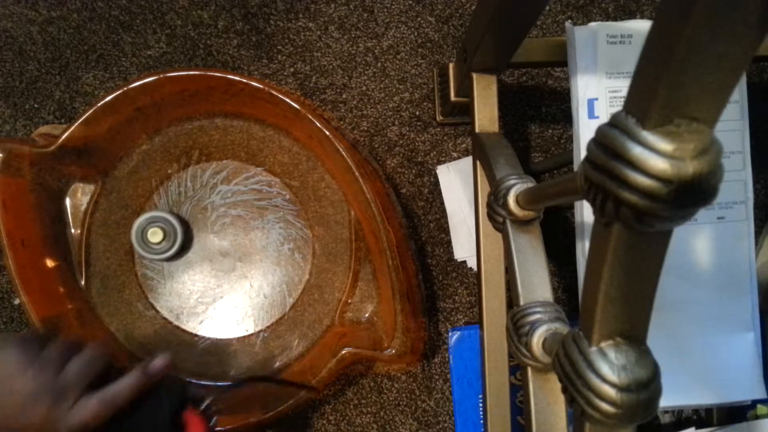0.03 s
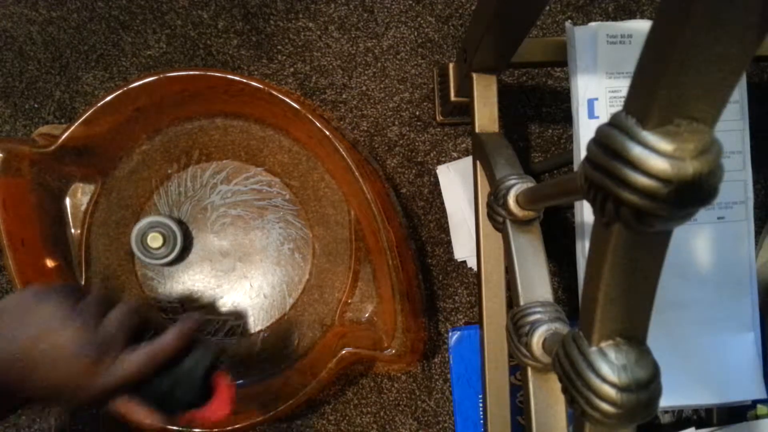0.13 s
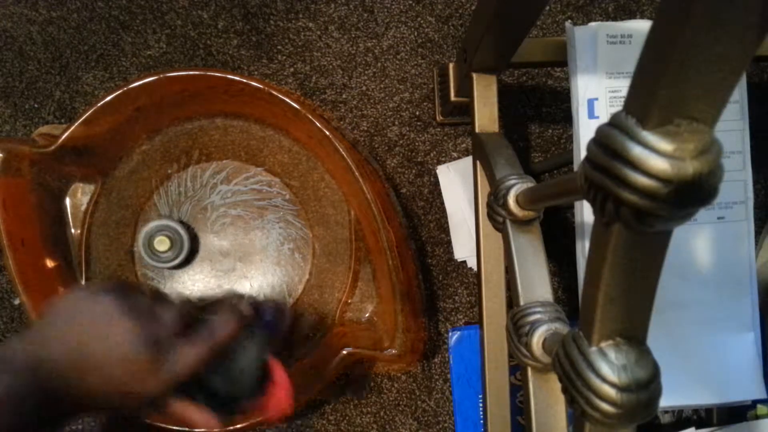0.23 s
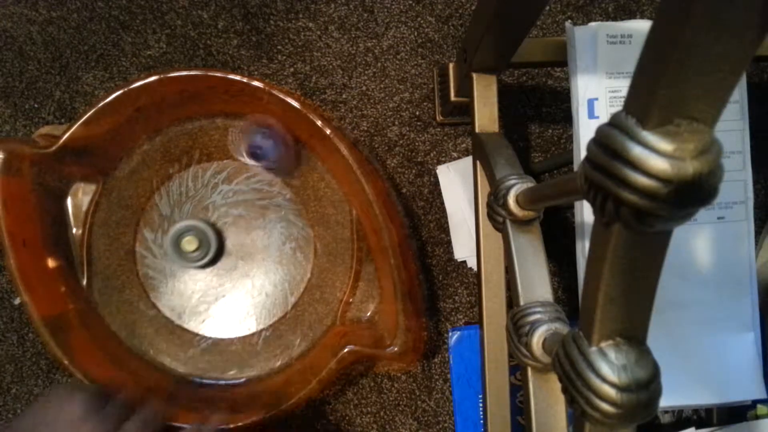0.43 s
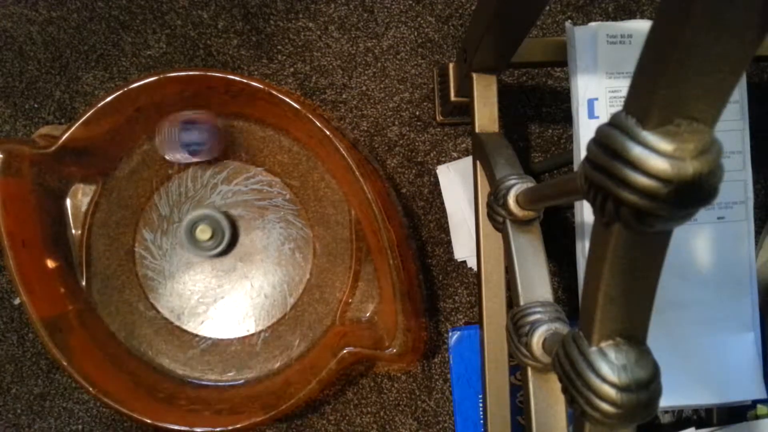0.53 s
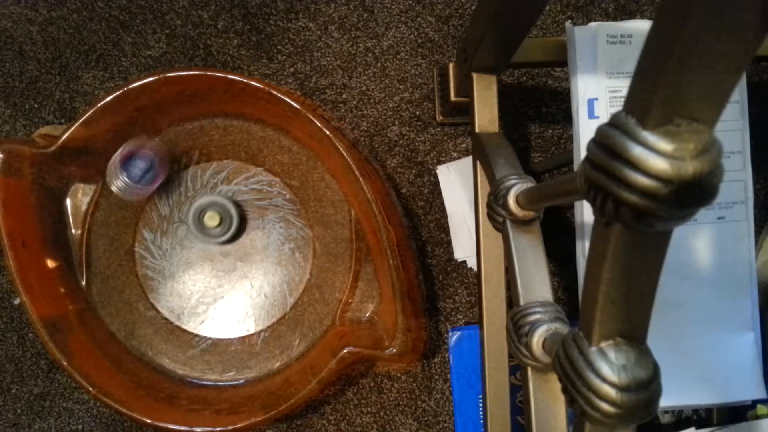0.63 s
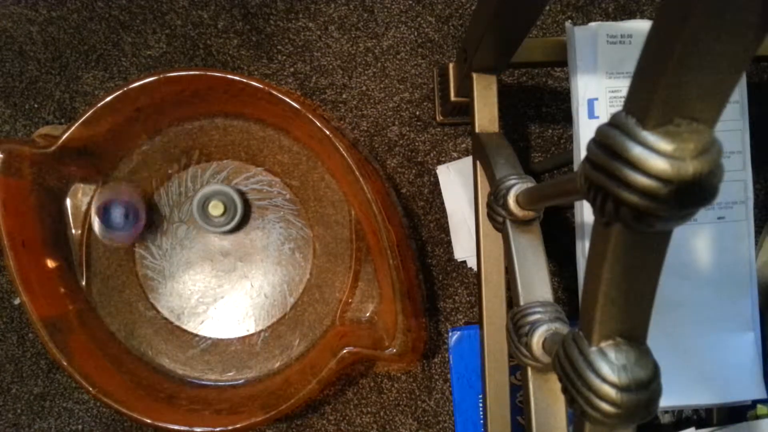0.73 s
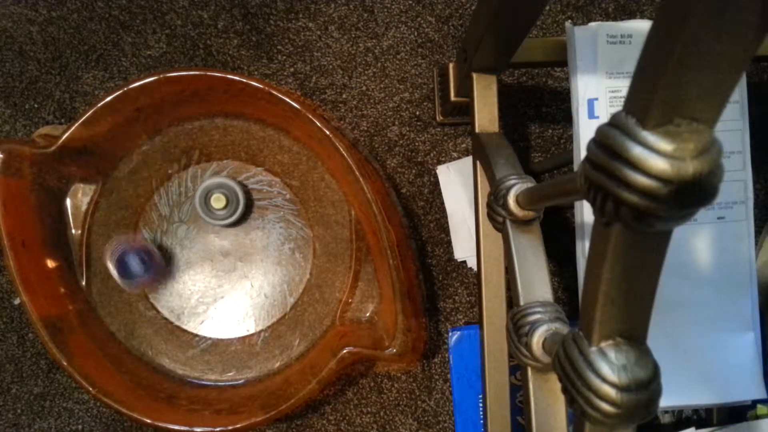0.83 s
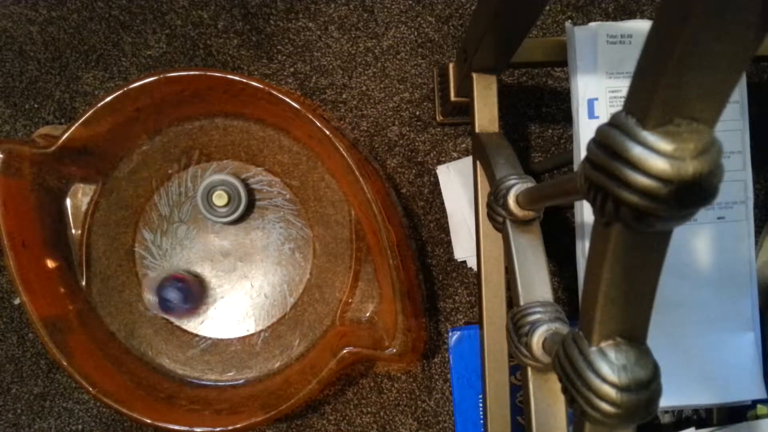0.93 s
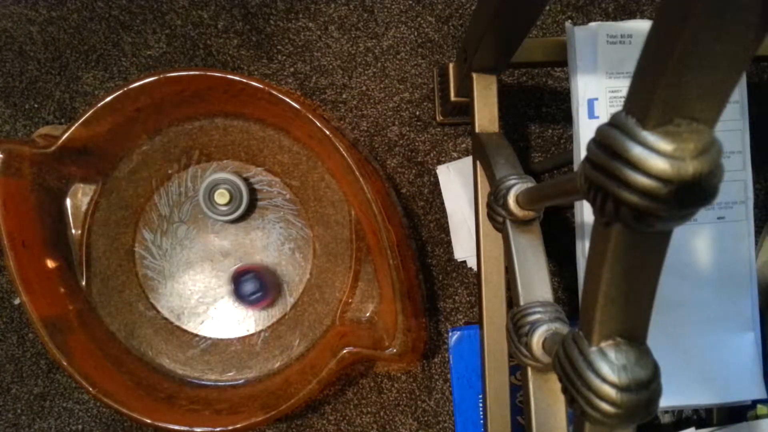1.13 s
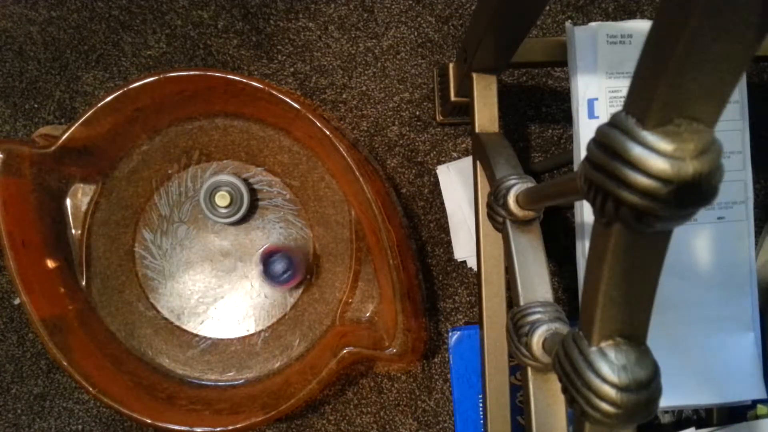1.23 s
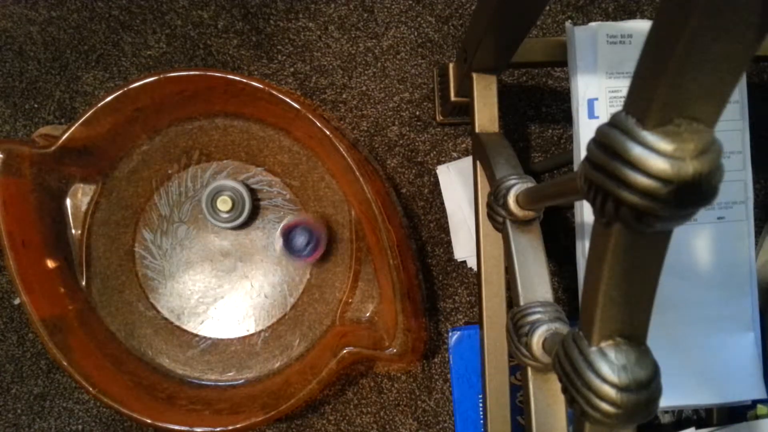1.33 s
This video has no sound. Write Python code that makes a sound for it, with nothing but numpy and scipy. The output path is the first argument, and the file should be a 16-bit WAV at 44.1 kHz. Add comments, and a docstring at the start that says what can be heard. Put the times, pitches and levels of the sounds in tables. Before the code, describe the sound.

Close to the microphone in a small room, a spinning top clatters in a plastic bowl: first a short zip and click from its launcher, then a hollow landing, loud rattling knocks, and finally two tops softly humming.

```python
"""Spinning top launched into an arena

A ripcord is pulled through a toy launcher: its teeth rasp ever faster, then a catch lets the top go.
The top thuds into a thin plastic arena, bounces, rattles along the wall and settles to a hum
beside a second top. A small room echoes, and the close microphone clips on the loudest peaks."""
import sys
import numpy as np
from scipy import signal
from scipy.fft import rfft, irfft, next_fast_len
from scipy.io import wavfile
from scipy.ndimage import map_coordinates

SR = 44100
rng = np.random.default_rng(int(sys.argv[2]) if len(sys.argv) > 2 else 0)


def waveform_to_disk(signal):
    """Save audio, clipped to [-1, 1], as 16-bit WAV at the path in sys.argv[1]."""
    frames = np.transpose(np.atleast_2d(signal))
    scaled = np.clip(frames, -1, 1) * 32767
    samples = np.round(scaled).astype(np.int16)
    wavfile.write(sys.argv[1], SR, samples)


N = 61739


def amp(db):
    """Turn decibels into a gain."""
    return 10 ** (np.asarray(db) / 20)


def along(points, hz):
    """Read a table of (pitch_hz, value) rows at any pitch."""
    pitches, values = np.transpose(points)
    return np.interp(np.log(hz + 1), np.log(pitches + 1), values)


def curves(rows):
    """Join timed rows with straight lines: one curve for each column after the time."""
    times, *columns = np.transpose(rows)
    return [np.interp(np.arange(N) / SR, times, column) for column in columns]


def wobble(rate):
    """A smooth random curve that passes through rate new values a second."""
    return map_coordinates(rng.standard_normal(N // 100), [np.arange(N) * rate / SR], mode="wrap")


def filtered(x, response):
    """Multiply each frequency in x by response(hz)."""
    size = next_fast_len(N + SR // 2)
    return irfft(rfft(x, size) * response(np.fft.rfftfreq(size, 1 / SR)), size)[..., :N]


def noise(tone, alike):
    """Stereo noise of strength 1, shaped by a tone table; alike is the share both sides have in common."""
    left, right, both = filtered(rng.standard_normal((3, N)), lambda hz: amp(along(tone, hz)))
    mix = np.sqrt(alike) * both + np.sqrt(1 - alike) * np.array([left, right])
    return mix / np.sqrt(np.mean(mix ** 2) + 1e-20)


def pan(left_db):
    """Two gains that make the left side left_db louder; below zero, the right is louder."""
    return amp(np.array([[.5], [-.5]]) * left_db)


def fade(fade_s):
    """Half a second of a curve that starts at 1 and drops 60 dB every fade_s."""
    return np.exp(-np.log(1000) * np.arange(SR // 2) / SR / fade_s)


def ring(hz, fade_s):
    """One tone that dies away."""
    return fade(fade_s) * np.sin(2 * np.pi * hz * np.arange(SR // 2) / SR)


def strikes(times, gains, shape):
    """Start a copy of the shape at each time, with its own gain."""
    pulses = np.bincount(np.abs(np.asarray(times) * SR).astype(int), gains, N)[:N]
    return signal.fftconvolve(pulses, shape)[:N]


def bursts(times, db, shape):
    """The loudness curve of overlapping blows whose power adds up."""
    return np.sqrt(np.abs(strikes(times, amp(db) ** 2, shape ** 2)))


# How long the room rings: pitch_hz, fade_s
ROOM_FADES = [(100, 0.37), (400, 0.29), (1500, 0.42), (4500, 0.34), (9000, 0.46), (15000, .25)]
# The tone of its echo: pitch_hz, level_db
ROOM_TONE = [(60, -13.5), (250, -18), (700, -7), (2000, -4), (5000, -4), (14000, -7.5)]
ECHO_DELAY_S = 0.0048


def room(x):
    """The walls return a blurred echo in which each pitch dies at its own speed."""
    hz, t, spectrum = signal.stft(rng.standard_normal((2, SR // 2)), SR, nperseg=256)
    decay = np.exp(-np.log(1000) * t / along(ROOM_FADES, hz)[:, None])
    tail = signal.istft(spectrum * decay, SR, nperseg=256)[1]
    tail = np.pad(tail / np.linalg.norm(tail[0]), ((0, 0), (int(ECHO_DELAY_S * SR), 0)))
    echo = signal.fftconvolve(x.sum(0)[None] / np.sqrt(2), tail, axes=1)[:, :N]
    return filtered(echo, lambda f: amp(along(ROOM_TONE, f))) * pan(left_db=3)


# Tones of the tips spinning on the arena floor: pitch_hz, level_db, left_db
HUM_TONES = [(215.6, -60.5, -4), (349, -68.5, -5), (406.4, -52, 5.5), (484, -64, -11), (564, -60.5, -2.5),
             (586, -54.5, -8), (810, -74.5, 1)]
# How the hum swells and sinks: time_s, change_db
HUM_SWELL = [(0, -11), (.7, 10), (.85, -10.5), (1.03, -4), (1.14, 1), (1.23, 1), (1.3, -3.5), (1.4, -3.5)]
# Scraping tips and room air: pitch_hz, level_db
SCRAPE_TONE = [(25, -19.5), (50, -18.5), (80, -11.5), (140, -14), (260, -6.5), (620, -7.5), (950, -11.5),
               (2000, -18.5), (4500, -23), (8000, -25), (14500, -28.5)]


def spinning_tops():
    """The tips make the arena floor hum in wavering tones, over a faint scrape."""
    swell_db, = curves(HUM_SWELL)
    hum = 0
    for hz, db, left_db in HUM_TONES:
        phase = 2 * np.pi * np.cumsum(hz * (1 + 0.0046 * wobble(15))) / SR
        gain = np.sqrt(2) * amp(db + swell_db + 2.86 * wobble(12))
        hum += gain * np.sin(phase) * pan(left_db)
    scrape = amp(-51 + .8 * wobble(40)) * noise(SCRAPE_TONE, alike=0.17)
    return hum + scrape


# The tip's trip over the plastic: time_s, level_db, left_db
ROLL_PATH = [(0, -40, -7), (.07, -57.5, 7.5), (.14, -54, -7), (.24, -26, 1.5), (.32, -55, -28),
             (.37, -29.5, 11), (.45, -32.5, -2), (.5, -36.5, 8), (.58, -26.5, 6.5), (.63, -40.5, 6),
             (.72, -40, 4), (.82, -47.5, 1), (.89, -40.5, -0.5), (.97, -44.5, 0), (1.02, -64.5, 2.5),
             (1.4, -72, -14.5)]
# The arena's rumble under the tip: pitch_hz, level_db
RUMBLE_TONE = [(30, -46), (80, -18.5), (160, -30), (210, -2.5), (320, 5.5), (365, 1), (420, -5.5),
               (500, 2.5), (600, 2.5), (730, -16.5), (840, -3), (1100, -14), (2000, -20), (6000, -53)]
SPIN_HZ, FLUTTER_DB, BUMPS_DB = 66.2, -2, 4


def rolling_tip():
    """The travelling tip rumbles on the plastic, fluttering once a turn."""
    level_db, left_db = curves(ROLL_PATH)
    flutter_db = FLUTTER_DB * np.sin(2 * np.pi * SPIN_HZ * np.arange(N) / SR)
    gain = amp(level_db + flutter_db + BUMPS_DB * wobble(65))
    return gain * noise(RUMBLE_TONE, alike=0.89) * pan(left_db)


# The pull on the cord: time_s, teeth_per_s, level_db, left_db
CORD_PULL = [(.195, 110, -49, -9), (.215, 100, -39, -12), (.238, 190, -18, -5.5), (.247, 230, -25, -16),
             (.26, 330, -19.5, -8.5), (.272, 390, -15.5, -13), (.285, 520, -16.5, -5),
             (.302, 520, -18.5, 1), (.322, 400, -22.5, 0), (.36, 180, -41, -3.5)]
# The rasp of its teeth: pitch_hz, level_db
RASP_TONE = [(40, -64.5), (130, -51.5), (280, -29), (450, -29), (680, 2.5), (980, -11.5), (1150, -15.5),
             (1400, -3.5), (2400, -4.5), (3100, -1.5), (4300, 2.5), (5800, -1.5), (7200, -5), (10000, -10),
             (14500, -8.5)]
# Ringing tones of the launcher, with a thin high shimmer on each click: pitch_hz, level_db, fade_s
CLICK_TONES = [(2349, -5.5, .09), (2413, -1.5, 0.14), (3780, -11.5, 0.15), (3804, -13, 0.15),
               (4490, -0.5, 0.12), (4960, -23, 0.1464), (9126, -10.5, .18), (14050, -5, 0.17),
               (13144, -20, 0.16)]
# The cord's end and the catch snap against the launcher: start_s, low_db, high_db
CATCH_SNAPS = [(0.277, -21.5, -32.5), (0.2825, -3.5, -1.5), (0.2946, -12.5, -9), (0.298, -17, -5),
               (0.3156, -33, -11)]
# The low and the high part of a snap: pitch_hz, level_db
SNAP_LOW_TONE = [(200, -42.5), (690, -5), (950, -14.5), (1130, -34), (1450, -21.5), (2100, -6.5),
                 (2430, 3.5), (2800, -7.5), (3600, -33.5)]
SNAP_HIGH_TONE = [(2500, -29), (3200, -7), (3570, 4.5), (3850, 5), (4300, -5), (4900, -24.5), (8000, -11),
                  (14500, -13.5)]
TOOTH_SCATTER_S, TOOTH_SCATTER_DB, SLIDE_SHARE, CLICK_RING_DB = 0.00017, 3.5, 0.68, -3
BASS_CUT_HZ, HIGHEST_HZ = 208, 14700


def launcher():
    """Each tooth of the cord clicks with a ring and a high shimmer; the catch snaps as the top leaves."""
    teeth_per_s, level_db, left_db = curves(CORD_PULL)
    t = np.arange(N) / SR
    pulling = (t > CORD_PULL[0][0]) * (t < CORD_PULL[-1][0])
    teeth_passed = np.floor(np.cumsum(teeth_per_s * pulling) / SR)
    teeth = np.flatnonzero(np.diff(teeth_passed))  # the samples where a tooth clicks
    chance = rng.standard_normal((N // 100, 2))[:len(teeth)]
    times = t[teeth] + TOOTH_SCATTER_S * chance[:, 0]
    sizes = amp(TOOTH_SCATTER_DB * chance[:, 1])
    clicks = strikes(times, sizes, fade(fade_s=0.019))
    rasp = (clicks + SLIDE_SHARE) * noise(RASP_TONE, alike=0.22) * amp(level_db) * pulling
    click_ring = sum(amp(db) * ring(hz, fade_s) for hz, db, fade_s in CLICK_TONES) / len(CLICK_TONES)
    ringing = strikes(times, sizes * amp(level_db[teeth] + CLICK_RING_DB), click_ring)
    start_s, low_db, high_db = np.transpose(CATCH_SNAPS)
    snap_fade = fade(fade_s=0.0516)
    snaps = bursts(start_s, low_db, snap_fade) * noise(SNAP_LOW_TONE, alike=0.55)
    snaps += bursts(start_s, high_db, snap_fade) * noise(SNAP_HIGH_TONE, alike=0.081)
    sound = (rasp + ringing) * pan(left_db) + snaps * pan(left_db=3.5)
    # The launcher gives off no bass: everything below about BASS_CUT_HZ falls away.
    return filtered(sound, lambda hz: (hz < HIGHEST_HZ) * (1j * hz / (BASS_CUT_HZ + 1j * hz)) ** 2)


# Hits on the arena: start_s, boom_db, wall_db, clack_db, tick_db, spot_hz (the struck spot's pitch)
ARENA_HITS = [(.009, -46, -69, -52, -42.5, 293), (.0205, -39.5, -43, -33, -39.5, 284.5),
              (.039, -43, -42.5, -40, -41, 290), (.152, -48.5, -49, -48, -56, 300),
              (.175, -39, -56, -43, -46.5, 660), (.223, -35, -25, -25.5, -48, 614),
              (.331, -11.5, -13, -20.5, -47, 217), (.4568, -13.5, -12, -20.5, -24.5, 830),
              (.4605, -28.5, -18, -35.5, -22, 595), (0.5139, -27, -4, -12.5, -24, 810),
              (.5195, -8.5, -12.5, -9.5, -26.5, 286), (.533, -26, -19, -17, -35.5, 694),
              (.553, -30.5, -21.5, -26.5, -43.5, 267), (.5675, -22, -20, -37, -33.5, 285),
              (0.6362, -36, -20.5, -17.5, -19.5, 810), (.642, -29, -10, -14.5, -21.5, 646),
              (.650, -35.5, -18, -10, -17.5, 624), (0.6574, -28, -8, -8.5, -22.5, 1860),
              (0.6655, -33, -11, -14, -18, 676), (.706, -47, -24, -32.5, -48, 427),
              (.901, -47.5, -28, -41.5, -70.5, 610), (.9125, -24.5, -26.5, -35, -37, 635),
              (0.9255, -31, -51, -48.5, -47.5, 256), (0.932, -56, -31.5, -45.5, -43, 265)]
# Ringing tones of its floor and wall: pitch_hz, level_db, fade_s
ARENA_TONES = [(216, -0.5, 0.1333), (262.2, 1, 0.099), (311.2, -2, 0.13), (418.4, -10, 0.43),
               (436.4, -7, 0.25), (552.5, -12.5, 0.24), (601.6, -3, 0.19), (634.3, 2, 0.15),
               (716, -4.5, 0.035), (821, 0, 0.1), (846, -5.5, 0.17), (976.5, -5.5, 0.095),
               (1018, -10.5, 0.34), (1867, -11.5, 0.084)]
# The plastic's four short noises, from dull to sharp: pitch_hz, level_db
BOOM_TONE = [(20, -49), (50, -37), (80, -25), (130, -16.5), (165, -15.5), (200, -1), (290, 6), (450, -13),
             (700, -20.5), (1500, -55.5)]
WALL_TONE = [(80, -72), (280, -24), (420, 0.5), (500, -0.5), (600, 7), (730, 2), (850, -1.5), (1100, -14),
             (2000, -44)]
CLACK_TONE = [(80, -62), (350, -19), (820, 5), (1200, 2), (1800, 1), (2600, -5), (3400, -7), (4600, -9.5),
              (5600, -20), (9000, -27), (15000, -43)]
TICK_TONE = [(100, -62.5), (800, -37), (2500, -7), (4400, 9), (6000, -3.5), (9500, -5.5), (11000, -12.5),
             (14500, -15)]
# Which side rings as the top circles: time_s, left_db
RINGING_SIDE = [(.33, -3), (.55, -1.5), (.65, -3.5), (.72, 9.5), (.85, 1.5), (.9, -2.5)]
BOOM_HZ, WALL_HZ = 303, 420  # tones below the first follow boom_db, above the second wall_db
SPOT_DB, SPOT_OCTAVES = 7, 0.25  # boost for tones near the struck spot's pitch
RING_DB, RING_SCATTER_DB, RISE_S, THUMP_DB = -6.5, 2.5, 0.0022, -16.5


def arena_hits():
    """Each hit rings the thin plastic and adds a boom, a thump, a wall knock, a clack and a tick."""
    start_s, boom_db, wall_db, clack_db, tick_db, spot_hz = np.transpose(ARENA_HITS)
    rise = 1 - np.exp(-np.arange(SR // 2) / SR / RISE_S)
    scatter_db = RING_SCATTER_DB * rng.standard_normal((len(ARENA_HITS), len(ARENA_TONES)))
    signs = np.sign(rng.standard_normal(scatter_db.shape))
    ringing = 0
    for k, (hz, db, fade_s) in enumerate(ARENA_TONES):
        wall_share = np.clip((hz - BOOM_HZ) / (WALL_HZ - BOOM_HZ), 0, 1)
        hit_db = (1 - wall_share) * boom_db + wall_share * wall_db + scatter_db[:, k]
        hit_db += SPOT_DB * np.exp(-(np.log2(hz / spot_hz) / SPOT_OCTAVES) ** 2)
        ringing += strikes(start_s, signs[:, k] * amp(hit_db + db + RING_DB), rise * ring(hz, fade_s))
    boom = bursts(start_s, boom_db, rise * fade(fade_s=0.095)) * noise(BOOM_TONE, alike=0.94)
    # The whole arena thumps against the carpet with each boom.
    thump = strikes(start_s, amp(boom_db + THUMP_DB), ring(hz=103.9, fade_s=0.0489))
    knock = bursts(start_s, wall_db, rise * fade(fade_s=0.11)) * noise(WALL_TONE, alike=0.44)
    clack = bursts(start_s, clack_db, fade(fade_s=0.11)) * noise(CLACK_TONE, alike=0.21)
    tick = bursts(start_s, tick_db, fade(fade_s=0.028)) * noise(TICK_TONE, alike=0.17)
    left_db, = curves(RINGING_SIDE)
    return (ringing + boom + thump + knock + clack) * pan(left_db) + tick * pan(left_db=-14)


LEFT_LAG_S, PULL_ECHO_DB, HITS_ECHO_DB = 0.0004335, -9, -6


def scene():
    """Launcher and arena lie a little to the right in the room, so that side hears them first."""
    pull, hits = launcher(), arena_hits()
    sources = pull + hits + rolling_tip() + spinning_tops()
    delay_s = LEFT_LAG_S * np.array([[.5], [-.5]])
    direct = filtered(sources, lambda hz: np.exp(-2j * np.pi * hz * delay_s))
    return direct + amp(PULL_ECHO_DB) * room(pull) + amp(HITS_ECHO_DB) * room(hits)


CLIP_HARDNESS = 12


def record(dry):
    """The microphone flattens the loudest peaks and keeps nothing above HIGHEST_HZ."""
    clipped = dry / (1 + np.abs(dry) ** CLIP_HARDNESS) ** (1 / CLIP_HARDNESS)
    return filtered(clipped, lambda hz: hz < HIGHEST_HZ)


dry = scene()
out = record(dry)
waveform_to_disk(out)
```